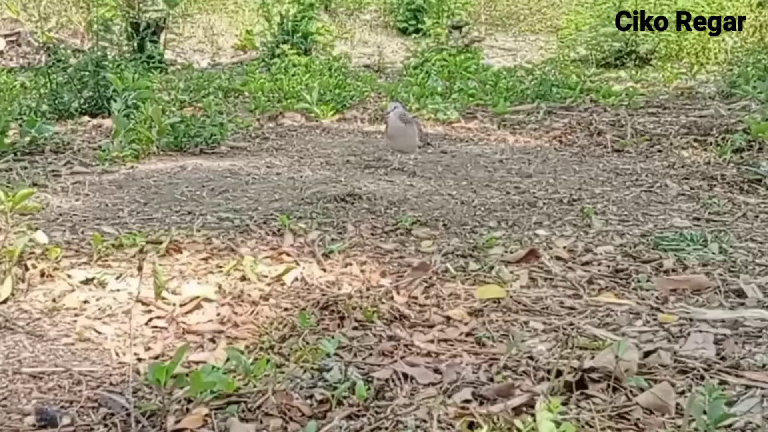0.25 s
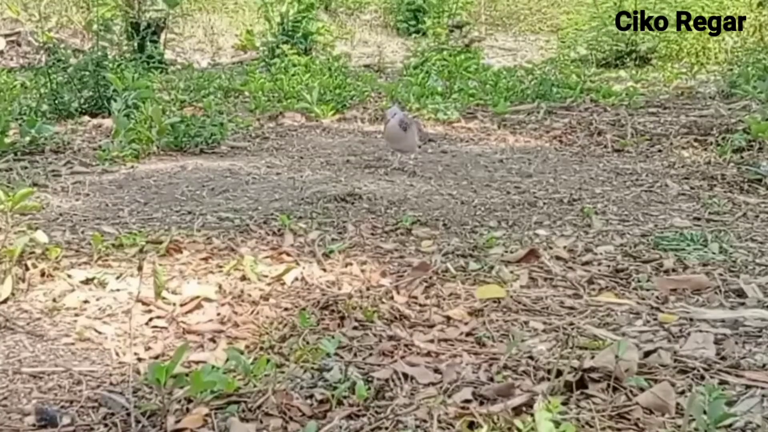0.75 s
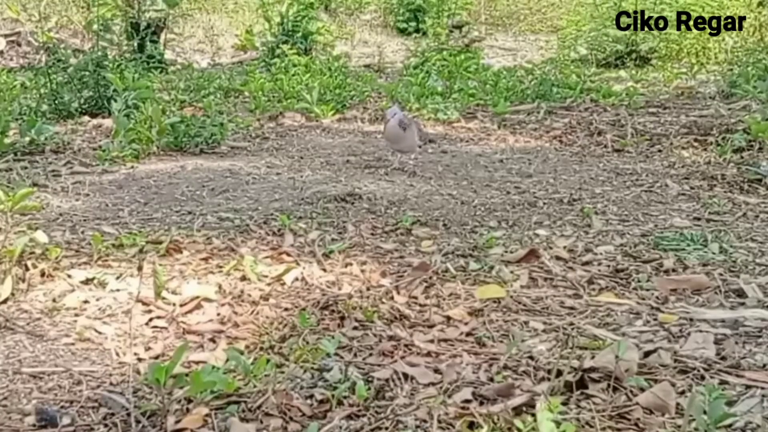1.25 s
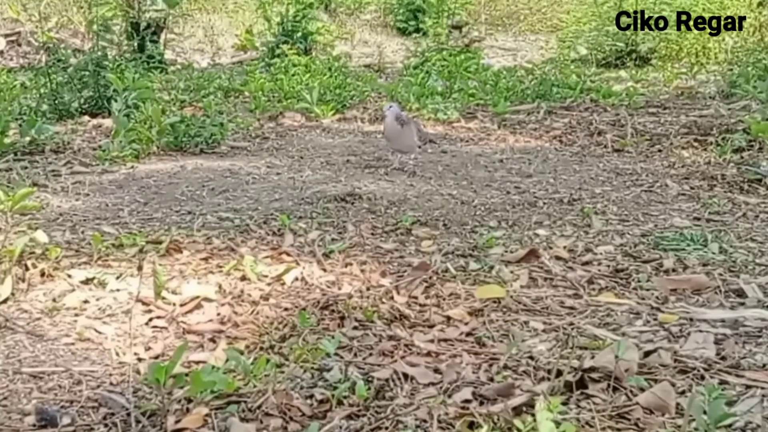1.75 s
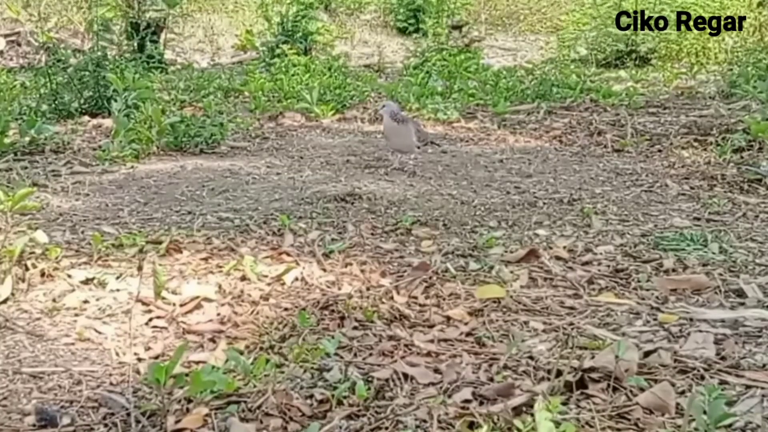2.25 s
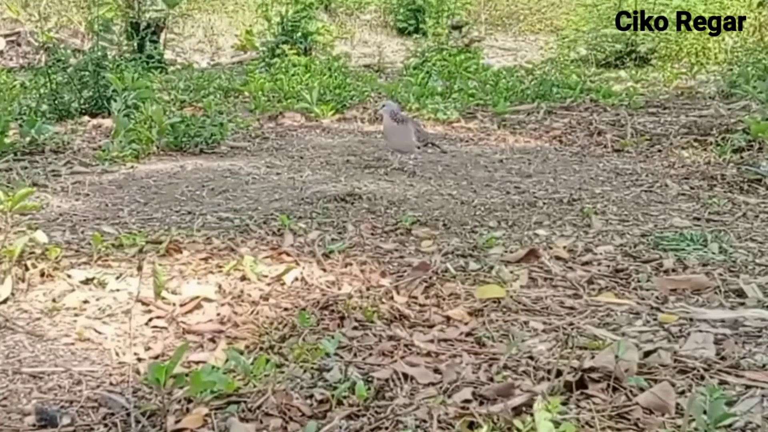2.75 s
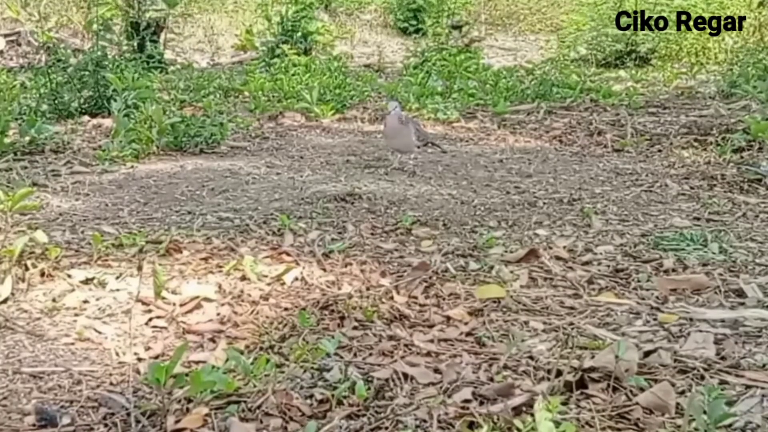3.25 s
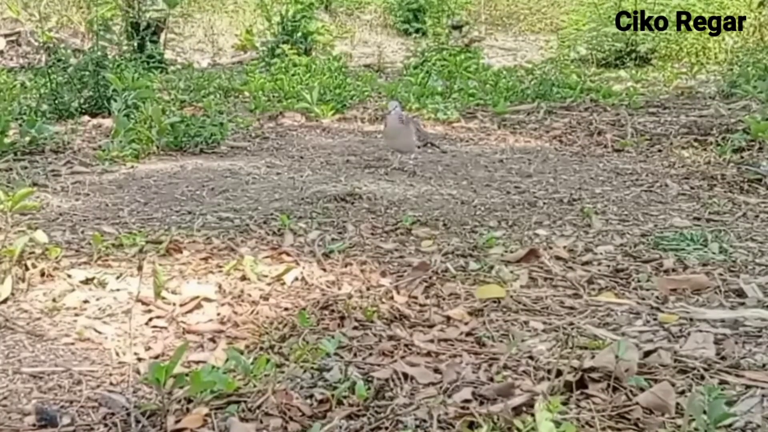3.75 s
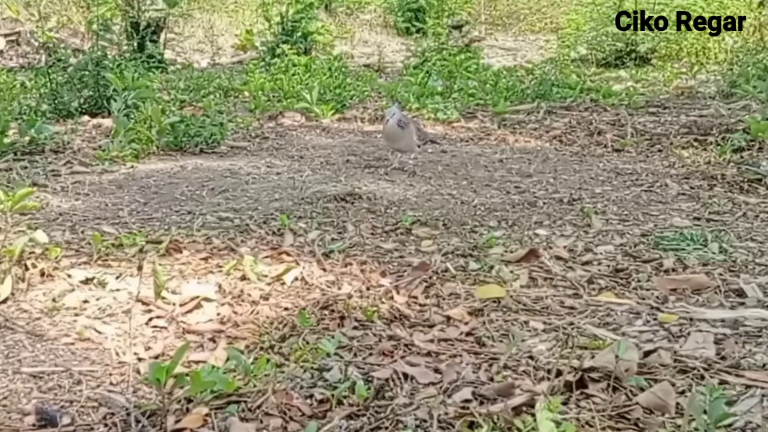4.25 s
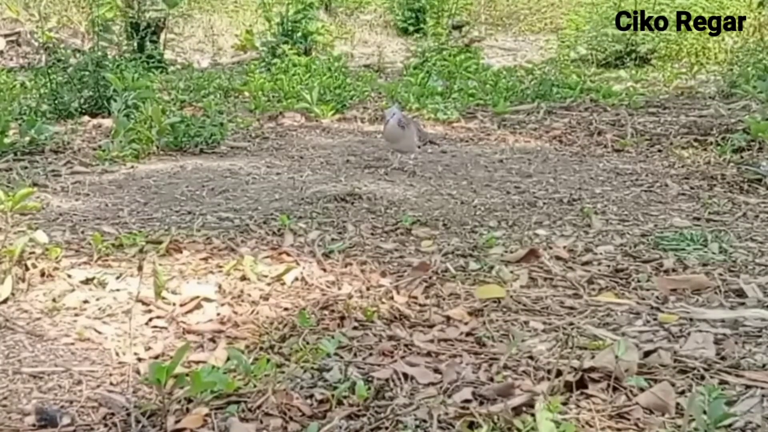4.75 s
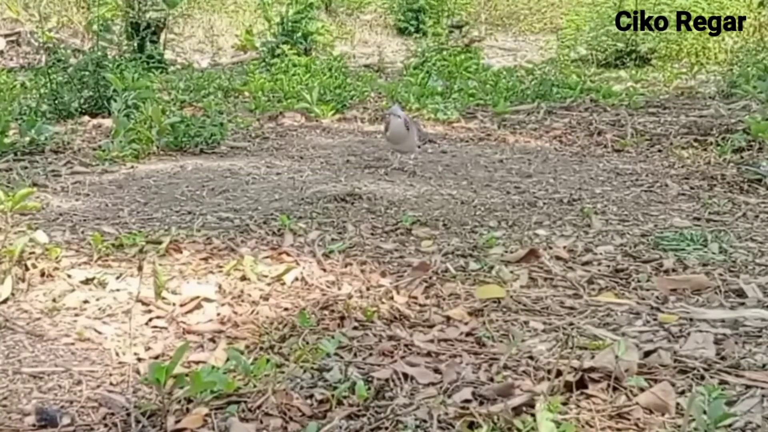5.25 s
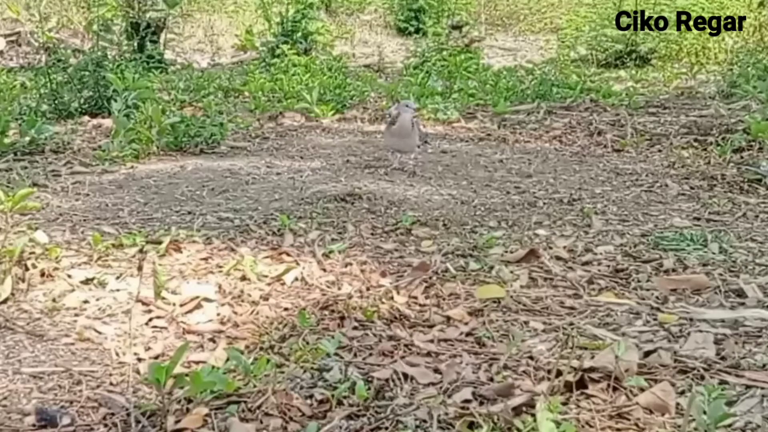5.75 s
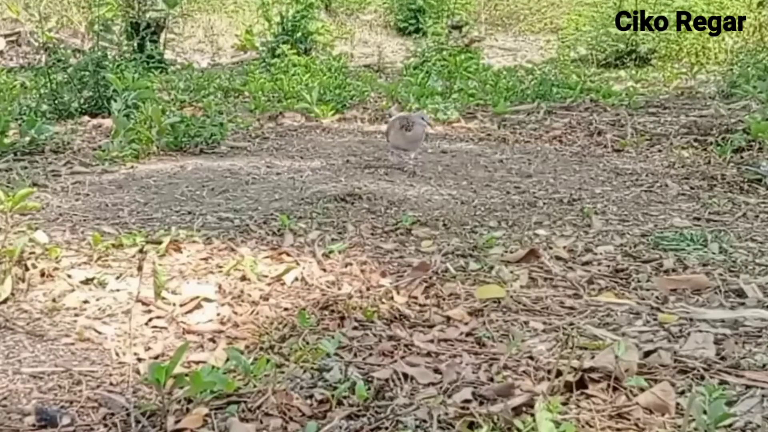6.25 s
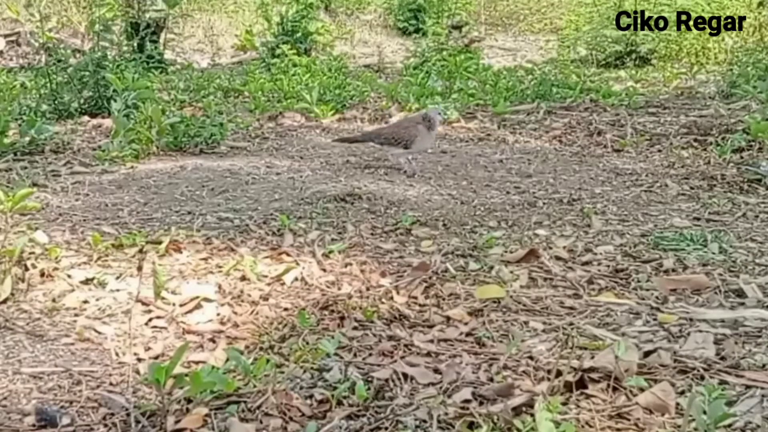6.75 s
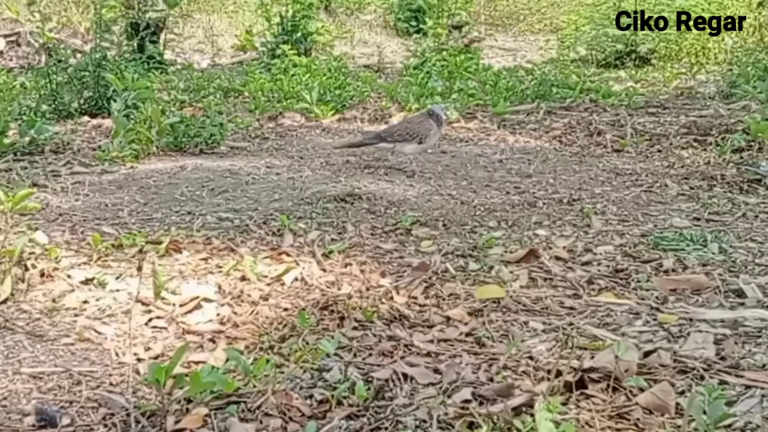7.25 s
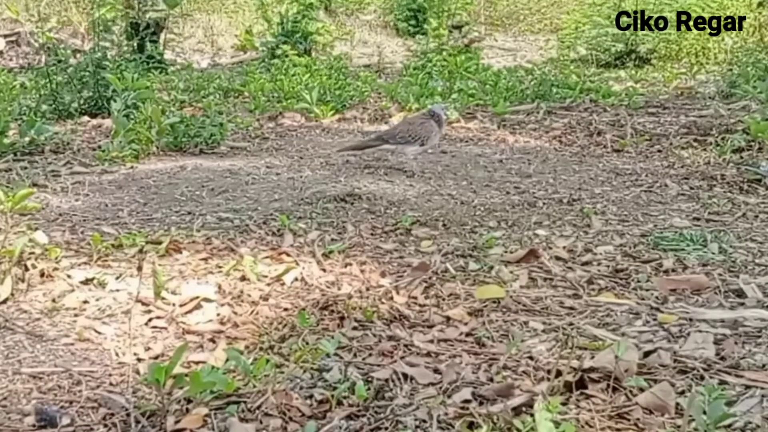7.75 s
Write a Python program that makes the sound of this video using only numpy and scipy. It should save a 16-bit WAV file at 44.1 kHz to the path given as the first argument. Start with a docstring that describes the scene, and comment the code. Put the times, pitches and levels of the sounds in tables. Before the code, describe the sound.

Spotted dove cooing in purring, fluttering notes outdoors, a second dove replying far off, while low wind thumps the microphone and small birds chirp quietly.

```python
"""Two spotted doves coo in a leafy garden: pure throat tones, chopped into rolls by a fluttering valve.
From the outset noise makes foliage hiss and wind; ragged eddies thump it and fluttering tones chirp.
The near dove calls at 0.6 s, leaves tick as noise bursts from 1.6 s, and the far dove answers at 2.5 s.
Wind buffets hardest near 3.6 s; the near dove calls again at 4.2 s and thin gliding tones whistle from 4.6 s.
The far dove answers at 6.2 s, and the near one begins a last call at 7.2 s."""
import sys
import numpy as np
from scipy import signal
from scipy.io import wavfile
from scipy.ndimage import uniform_filter1d, map_coordinates

SR = 44100
rng = np.random.default_rng(int(sys.argv[2]) if len(sys.argv) > 2 else 0)


def waveform_to_disk(signal):
    """Save audio, clipped to [-1, 1], as 16-bit WAV at the path in sys.argv[1]."""
    frames = np.transpose(np.atleast_2d(signal))
    scaled = np.clip(frames, -1, 1) * 32767
    samples = np.round(scaled).astype(np.int16)
    wavfile.write(sys.argv[1], SR, samples)


N = 352800

# Dove levels are those before the throat's band-pass.
# smooth dove notes: t/s, shape, reference level/dB, pitch ratio
COOS = [(.572, "opening", -8.5, 1.007), (1.17, "pip", -7.5, 1.03), (2.48, "far murmur", -46.5, 0.95),
        (2.68, "far hoot", -20.5, 0.99), (3.035, "pip", -31, 1.27), (4.188, "opening", -8, 1.018),
        (4.793, "pip", -7.5, 1.046), (6.15, "far murmur", -45, 0.99), (6.352, "far hoot", -19.5, 1.013),
        (6.711, "pip", -35.5, 1.16), (7.225, "opening", -11.5, 1.015), (7.832, "pip", -14, 1.04)]
# shapes of the smooth notes: t/s from the onset, level/dB re the note, f/Hz before the pitch ratio
COO_SHAPES = { "opening": [(0, -17.5, 441), (.012, -10, 582), (.032, -1.5, 640), (.052, -1.5, 615),
              (.075, -6.5, 600), (.097, -11.5, 479), (.116, -28, 490)], "pip": [(0, -19, 595),
              (.006, -3, 544), (.013, -13, 602), (.02, -40.5, 591)], "far murmur": [(0, -7, 550),
              (.02, -1.5, 550), (.05, -1.5, 523), (.072, -4, 550)], "far hoot": [(0, -32, 542),
              (.04, -16, 594), (.08, -2.5, 672), (.115, 0, 720), (.152, 0.5, 703), (.165, -11.5, 613),
              (.174, -16, 640)], }
# the second note, a roll that swells into a hoot: t/s from the onset, level/dB re the note, f/Hz
SWELL_SHAPE = [(0, -25.5, 543.6), (.055, -22.5, 571), (.11, -11, 587.4), (.165, -6, 633.7), (.205, -5, 664),
               (.228, -0.5, 723), (.25, 0, 745), (.272, -0.5, 705), (.287, -3, 636), (.299, -11.5, 563),
               (.309, -30.5, 610)]
# swelling rolls: t/s, reference level/dB, initial pulse rate/(1/s), flutter duration/s,
# time of a brief level dip/s from the onset, depth of the dip/dB
SWELLS = [(.686, -3.5, 59, .213, .24, 15), (4.307, -3.5, 61.5, .218, .242, 0),
          (7.335, -6.5, 59, .225, .239, 2.5)]
# closing rolls: t/s from the onset, level/dB re the note, f/Hz, gap depth/dB (negative: gaps are louder)
PURR_SHAPES = { "near": [(0, 2, 710.5, 16.5), (.045, 0.2, 706.4, 26), (.17, 1, 695, 22),
               (.22, -2.4, 650, 18.5), (.3, -0.5, 647, 13), (.39, -3, 620, 12.5), (.408, -7.5, 612, -8.5),
               (.422, -5.5, 615, 6.5), (.433, -10, 596, 10.5)], "far": [(0, -5, 700, 18.5),
               (.07, 1, 735, 16.5), (.14, 0, 726.4, 16), (.21, -0.8, 667, 12.5), (.28, -7.5, 624, 12),
               (.35, -9, 639, 11), (.42, -13.5, 590, 2.5), (.45, -18.5, 560, 8.5), (.48, -24, 534, 3),
               (.55, -28.5, 504, -2)], }
# closing rolls: t/s, bird, reference level/dB, initial pulse rate/(1/s), rate increase/(1/s^2),
# stumble onset/s from the note's onset, stumble duration/s
PURRS = [(1.195, "near", -5.5, 40.88, 171.3, .322, 0.0558), (3.051, "far", -20, 42.46, 75.7, 0.45, 0.01),
         (4.819, "near", -6, 41.93, 136, 0.34, 0.016), (6.73, "far", -21, 40.76, 96.5, .355, 0.03),
         (7.857, "near", -8.5, 41.8, 147, .36, 0.02)]
# husky chirps: t/s, duration/s, f/Hz at start, middle and end before smoothing and flutter,
# mean amplitude/dB, overtone level/dB re the fundamental
CHIRPS = [(.295, 0.062, 2950, 2950, 2760, -49, -38.5), (.325, 0.059, 5620, 4550, 3800, -62, -31.5),
          (.365, 0.036, 4150, 3850, 3520, -55, -32), (0.806, 0.041, 2410, 3090, 3100, -39.5, -38),
          (0.832, 0.042, 3930, 4990, 4600, -50.5, -20.5), (.84, 0.076, 2250, 2880, 2390, -51, -24),
          (0.887, 0.043, 3820, 3200, 3250, -48, -30), (1.04, 0.028, 2300, 2260, 2330, -51.5, -34),
          (1.416, 0.035, 4450, 4030, 3570, -50, -27.5), (1.44, 0.039, 3020, 3097, 2740, -36, -29),
          (1.905, 0.051, 4600, 3420, 2820, -47, -27), (1.971, 0.029, 4400, 3120, 2530, -47.5, -21.5),
          (2.041, 0.022, 3500, 3290, 2900, -52, -20), (2.399, 0.08, 2610, 3060, 2220, -48.5, -29),
          (2.441, 0.074, 5640, 4520, 3280, -59, -35), (2.505, .035, 3740, 3440, 3190, -51.5, -30),
          (2.996, 0.032, 4250, 3700, 3420, -48.5, -34), (3.019, 0.034, 3150, 3110, 3200, -36, -40),
          (3.262, 0.04, 3520, 3240, 3050, -45, -30), (3.381, 0.036, 3120, 2930, 2880, -51, -23),
          (3.62, 0.048, 3960, 3560, 2880, -41.5, -20.5), (4.442, 0.047, 4700, 4280, 3630, -46.5, -20),
          (4.47, 0.047, 2470, 3230, 2520, -37, -33), (4.855, 0.12, 3625, 2900, 2930, -49.5, -21.5),
          (5.048, 0.0574, 2640, 2950, 2360, -46.5, -18.5), (5.069, 0.082, 5390, 4200, 3560, -51, -38),
          (5.135, 0.035, 3760, 3620, 3530, -48, -30.5), (5.708, 0.026, 4280, 4650, 3800, -38, -21.5),
          (5.731, 0.023, 3690, 3390, 2980, -32.5, -32.5), (5.93, 0.031, 4020, 3340, 3020, -50.5, -31),
          (6.04, 0.029, 3530, 3090, 2460, -52, -24), (6.391, 0.042, 4260, 3720, 3460, -45, -24),
          (6.414, 0.064, 2920, 3157, 2940, -40, -33), (7.038, 0.017, 2950, 3470, 3900, -42, -23),
          (7.055, 0.03, 4460, 3610, 2850, -36, -20), (7.1, 0.016, 4770, 4760, 4600, -50, -30),
          (7.579, 0.042, 4350, 3600, 2740, -43.5, -29), (7.633, 0.037, 4180, 3500, 2710, -43, -28),
          (7.934, 0.031, 3070, 2940, 2800, -50, -26)]
# clear whistles: t/s, duration/s, initial f/Hz, final f/Hz approached, settling time/s,
# rms level/dB at the start, rms level/dB at three quarters of the length (both before the twinkle)
WHISTLES = [(4.621, 0.036, 1360, 1320, 0.032, -69, -63), (5.21, 0.13, 1210, 1180, 0.061, -57, -64),
            (5.5, .03, 5060, 5020, .02, -58, -65.5), (5.6, 0.096, 5080, 4990, 0.036, -67, -62),
            (5.939, 0.54, 5950, 5070, 0.17, -71.5, -65.5), (6.27, 0.071, 2730, 3080, 0.02, -62, -40.5),
            (6.325, .03, 3090, 2310, 0.034, -48, -52), (6.462, 0.55, 4990, 4270, .33, -69, -57.5),
            (7.28, 0.43, 4630, 4150, 0.19, -64.5, -45), (7.58, .18, 4350, 4310, .05, -57, -60.5),
            (7.87, .09, 4180, 4150, 0.083, -54, -60)]
# ticks of dry leaves and twigs: t/s, body noise level/dB and treble noise level/dB (both before
# band-pass), t60/s (limited to 0.004-0.08)
TICKS = [(1.641, -26, -60, 0.07), (1.66, -26, -63, 0.11), (1.695, -28.5, -61, 0.023),
         (2.9387, -35, -64, 0.037), (3.157, -29.5, -45, 0.11), (3.243, -32, -61, 0.04),
         (3.33, -30, -58, 0.023), (3.8067, -54, -56, 0.036), (4.1376, -48, -50, 0.04),
         (4.82, -34, -49, 0.084), (6.3407, -35, -44, 0.066), (6.3807, -25, -51, 0.043),
         (6.3997, -34, -49, 0.088), (7.221, -28.5, -45, 0.042), (7.802, -69, -51, 0.043)]
# wind eddies: t/s, level/dB before overload, nominal f/Hz, nominal cycles to the crest
THUMPS = [(0.361, -34, 75, 1.5), (0.599, -24, 92, 0.96), (0.676, -22, 101.4, 0.99),
          (0.883, -19, 157.4, 1.66), (0.91, -14.5, 96.9, 1.3), (0.988, -15, 127, 1.43),
          (1.099, -14, 111.5, 1.16), (1.117, -14.5, 172, 0.95), (1.187, -29, 80.7, 1),
          (1.374, -10, 130, 1.24), (1.439, -12.5, 90, 0.89), (1.556, -17, 109, 1.1),
          (1.639, -26.5, 100, 1.2), (1.718, -17.5, 90.4, 1.2), (1.777, -21.5, 98, 0.68),
          (1.866, -24.5, 106, 1.3), (1.927, -24, 129, 0.67), (1.991, -23.5, 102, 1),
          (2.111, -19.5, 140, 1.2), (2.159, -22, 80, 0.52), (2.202, -19.5, 98, 0.66),
          (2.287, -28.5, 75.4, 0.98), (2.826, -25, 82, 0.83), (3.094, -28.5, 101, 1.4),
          (3.251, -12, 158, 1.07), (3.271, -13.5, 112, 1.2), (3.352, -26, 116, 1.1), (3.428, -33, 86, 1.2),
          (3.507, -14, 119, 1.2), (3.534, -14.5, 128, 1.14), (3.559, -11.5, 88.8, 1.3),
          (3.578, -10.5, 75, 1), (3.601, -5, 141.6, 1.08), (3.624, -8, 169, 1.23), (3.657, -6.5, 128, 1.05),
          (3.684, -7.5, 155, 1.14), (3.706, -6.5, 127.4, 0.78), (3.8, -22.5, 121, 0.98),
          (3.862, -17, 118, 0.85), (4.073, -16, 137, 1.3), (4.137, -7, 130.5, 0.85),
          (4.326, -19, 128.7, 1.3), (4.363, -9, 118, 1.06), (4.409, -19, 83.4, 0.81),
          (4.579, -18, 79.8, 0.78), (4.656, -23.5, 88, 1.3), (4.701, -23, 104, 1.5),
          (4.758, -19.5, 80.7, 0.59), (4.835, -18, 81.5, 0.8), (4.904, -29, 85, 1.3),
          (4.983, -25, 94.2, 1.2), (5.153, -30.5, 95, 1.1), (5.257, -25, 113, 0.56),
          (5.358, -26.5, 96, 0.95), (5.453, -11, 88.4, 0.96), (7.713, -24.5, 94, 1.1),
          (7.866, -17, 91.5, 0.84)]
# slow wind strength before eddies and overload: t/s, rms level/dB
GUSTS = [(0.0, -49), (0.2, -47), (0.58, -42), (1.09, -29.5), (1.31, -31), (1.42, -24), (1.58, -29.5),
         (1.72, -34), (2.41, -44), (2.81, -39), (2.92, -45.5), (3.16, -36), (3.3, -30.5), (3.39, -28.5),
         (3.68, -23.5), (4.01, -30.5), (4.12, -33), (4.39, -29.5), (4.52, -34.5), (4.81, -30.5),
         (5.12, -39.5), (5.53, -37), (6.17, -48), (7.29, -45), (7.91, -38), (8.0, -38)]
# relative wind spectrum before the microphone's response: f/Hz, level/dB
WIND_SPECTRUM = [(12, -56), (20, -34.5), (75, 10), (156, -4), (216, -14), (274, -17.5), (348, -17),
                 (483, -40.5), (528, -43.5), (560, -37), (700, -55.5), (910, -81.5), (1540, -120)]
# relative spectrum of foliage and insects: f/Hz, level/dB
HISS_SPECTRUM = [(150, -25.5), (250, 5), (500, 2.5), (1000, -2), (1350, -7), (2000, -2), (2600, 0.5),
                 (3400, -1), (4300, -6.5), (5100, -15), (6500, -20), (8200, -18), (9600, -7.5),
                 (11200, -18), (13000, -25.5), (15400, -25.5)]
# strength of the hiss between about 7.5 and 12 kHz: t/s, rms level/dB
HISS_LEVEL = [(0.0, -65.5), (0.49, -64.5), (0.71, -63), (6.46, -63.5), (7.24, -60), (8.0, -61)]

SWELL_SPEEDUP_PER_S2, HOOT_JOIN_S = 66, 0.0094
SWELL_GAP_DB, SWELL_GAP_END_DB = 42, 13  # gap depth at the start and end of the flutter
CATCH_S = 0.0036  # half-width of the brief dip, to 1/e of its depth in dB
STUMBLE_PER_S, STUMBLE_GAP_DB = 38, 16  # pulse rate and gap depth while the valve hangs
SECOND_LEVEL_SHARE, END_DROP_DB = .75, 2.5  # a whistle reaches its second level at three quarters
THUMP_SAG, THUMP_WOBBLE, THUMP_RAGGED_DB = .15, .2, 2.5  # relative pitch fall, relative wobble, level
THUMP_RASP_DB = -8.5  # turbulence on the edge of each eddy
EDGE_HZ = 15500


def coo(shape, db, ratio):
    """Resonant radiation: the inflated throat emits a nearly pure tone with a slight waver."""
    curves = unroll(shifted(COO_SHAPES[shape], db, ratio))
    level_db, hz = (uniform_filter1d(c, size=260, mode="nearest") for c in curves)
    tone = sine(hz * (1 + 0.023 * wander(len(hz), 80.0)))
    return faded(gain_of(level_db + 0.34 * wander(len(hz), 90.)) * tone, 0.0037)


def swell(db, per_s, flutter_s, catch_s, catch_db):
    """Decaying modulation: the flutter quickens and shallows, then stops and lets the hoot through."""
    level_db, hz = unroll(shifted(SWELL_SHAPE, db))
    t = np.arange(len(hz)) / SR
    depth_times_s = [0, flutter_s, flutter_s + HOOT_JOIN_S]
    depth_db = np.interp(t, depth_times_s, [SWELL_GAP_DB, SWELL_GAP_END_DB, 0])
    dip_db = catch_db * np.exp(-((t - catch_s) / CATCH_S) ** 2)
    return roll(level_db - dip_db, hz, per_s + SWELL_SPEEDUP_PER_S2 * t, depth_db)


def purr(bird, db, per_s, speedup, stumble_s, hang_s):
    """Amplitude modulation at a rising rate: the flutter stumbles once as the valve hangs briefly."""
    level_db, hz, depth_db = unroll(shifted(PURR_SHAPES[bird], db))
    t = np.arange(len(hz)) / SR
    hung = 1. * (t > stumble_s) * (t < stumble_s + hang_s)
    hung = uniform_filter1d(hung, size=200)
    rate = (1 - hung) * (per_s + speedup * t) + hung * STUMBLE_PER_S
    return roll(level_db, hz, rate, (1 - hung) * depth_db + hung * STUMBLE_GAP_DB)


def roll(db, hz, rate, depth_db):
    """Joint amplitude and frequency modulation: a valve chops the tone, and pitch sweeps up per pulse."""
    turns = np.cumsum(rate) / SR + 0.03 * wander(len(rate), 60.)  # the valve keeps uneven time
    place, pulse = turns % 1, turns.astype(int)
    # each pulse has its own phase and strength
    chance = rng.uniform(-1.3, 1.7, (100, 2))[pulse]
    phase_chance, strength_chance = uniform_filter1d(chance, size=130, axis=0).T
    # the valve opens for 12 ms, or for the whole pulse if that is shorter
    opening = np.clip((place - .5) / np.minimum(0.012 * rate, 1), -.5, .5)
    shut = gain_of(-depth_db)
    gate = shut + (1 - shut) * np.cos(np.pi * opening) ** 1.22
    sweep = 0.0046 * np.minimum(depth_db, 15) * np.sin(2 * np.pi * (place - .5))
    phase = 2 * np.pi * np.cumsum(hz * (1 + sweep)) / SR + 1.5 * (1 - shut) * phase_chance
    strength_db = .5 * (1.5 - shut) * strength_chance
    return faded(gain_of(db + strength_db) * gate * np.sin(phase), 0.0019)


def shifted(shape, db, ratio=1):
    """Scaling: a note shape is raised to the level and pitch of one note."""
    return [(s, db + under_db, hz * ratio, *rest) for s, under_db, hz, *rest in shape]


def chirp(length, start_hz, middle_hz, end_hz, db, overtone_db):
    """Random modulation: fast flutter in pitch and strength makes a gliding whistle husky."""
    count = round(length * SR)
    hz = np.interp(np.linspace(0, 2, count), range(3), [start_hz, middle_hz, end_hz])
    hz = uniform_filter1d(hz, size=count // 4, mode="nearest")
    hz = hz * (1 + .07 * wander(count, 520.))
    tone = sine(hz) + gain_of(overtone_db) * sine(2 * hz)
    return faded(gain_of(db + 5.7 * wander(count, 500.)) * tone, 0.0059)


def whistle(length, first_hz, last_hz, settle_s, start_db, second_db):
    """Exponential glide: a thin pure tone settles in pitch and twinkles on its way through the leaves."""
    u = np.linspace(0, 1, round(length * SR))
    hz = last_hz + (first_hz - last_hz) * np.exp(-u * length / settle_s)
    db = np.interp(u, [0, SECOND_LEVEL_SHARE, 1], [start_db, second_db, second_db - END_DROP_DB])
    twinkle_db = 2.3 * wander(len(hz), 41.3)
    tone = sine(hz * (1 + .004 * wander(len(hz), 80.)))
    return faded(np.sqrt(2) * gain_of(db + twinkle_db) * tone, .015)  # root 2: rms to peak


def tick(db, treble_db, t60):
    """Impulsive excitation: decaying noise is split into a body and a treble band."""
    t = np.arange(4000) / SR
    envelope = gain_of(-60 * t / np.clip(t60, .004, .08)) * np.minimum(t / 0.00083, 1)
    crack = rng.standard_normal(len(t)) * envelope
    body = band(band(crack, 1400, 4000), 1400, 4000)
    return gain_of(db) * body + gain_of(treble_db) * band(crack, 5500, 14000)


def garden(x, t60, first_s):
    """Diffuse reflection: trunks and leaves scatter echoes that decay exponentially."""
    t = np.arange(SR // 2) / SR
    taps = rng.standard_normal(len(t)) * gain_of(-60 * t / t60) * (t > first_s)
    return signal.fftconvolve(x, taps / np.linalg.norm(taps))[:N]


def delayed(x, s):
    """Propagation delay: the same sound arrives s seconds later."""
    return np.pad(x, (round(s * SR), 0))[:N]


def thump(db, hz, cycles):
    """Vortex pressure: one eddy gives a ragged push of a few cycles, slowing a little."""
    turns = hz * np.arange(6000) / SR
    shape = (turns / cycles * np.exp(1 - turns / cycles)) ** 1.7
    sag = THUMP_SAG * (np.exp(-turns / cycles) - .4)
    speed = hz * (1 + sag + THUMP_WOBBLE * wander(len(turns), 63.0))
    level = gain_of(db + THUMP_RAGGED_DB * wander(len(turns), 170.0))
    rasp = gain_of(THUMP_RASP_DB) * wander(len(turns), 400.)
    return level * shape * (sine(speed) + rasp)


def wind():
    """Turbulent pressure: eddies press on the microphone in lumps of a few hundredths of a second."""
    rumble = noise(WIND_SPECTRUM, size=2048, patchy_db=2.5, flicker_db=3.5)
    rumble /= np.sqrt(uniform_filter1d(rumble ** 2, size=3000))  # the gusts alone set the slow level
    lumps = evened(rumble * gain_of(2.8 * wander(N, 22.)))
    push = gain_of(unroll(GUSTS)[0][:N]) * lumps
    for s, *row in THUMPS:
        add(push, s, thump(*row))
    # the diaphragm gives less to hard pushes and slow pressure
    return band(0.9 * np.tanh(push / 0.7), 69, 1200)


def hiss():
    """Superposition: foliage and distant insects merge into coloured noise."""
    x = noise(HISS_SPECTRUM, size=512, patchy_db=2.0, flicker_db=0.76)
    return gain_of(unroll(HISS_LEVEL)[0][:N]) * x / np.std(band(x, 7500, 12000))


def noise(points, size, patchy_db, flicker_db):
    """Spectral synthesis: random short-time spectra have drifting patches and a flicker shared by all f."""
    frames, hz = 4 * N // size + 5, np.fft.rfftfreq(size, 1 / SR)
    real, imaginary, patches = rng.standard_normal((frames, len(hz), 3)).T
    patches = uniform_filter1d(patches, size=9, axis=0)  # across pitch
    patches = evened(uniform_filter1d(patches, size=12, axis=1))  # across time
    f, db = np.transpose(points)
    colour_db = np.interp(np.log(hz + 1), np.log(f + 1), db)[:, None]
    flicker = evened(uniform_filter1d(rng.standard_normal(frames), size=4))
    level_db = colour_db + patchy_db * patches + flicker_db * flicker
    spectra = (real + 1j * imaginary) * gain_of(level_db)
    return signal.istft(spectra, nperseg=size, noverlap=3 * size // 4)[1][:N]


def gain_of(db):
    """Logarithmic level: decibels become an amplitude ratio."""
    return 10 ** (np.asarray(db) / 20)


def evened(x):
    """Normalisation: scales to rms 1."""
    return x / np.sqrt(np.mean(x ** 2) + 1e-20)


def add(mix, s, sound):
    """Linear superposition: mixes a sound in at s seconds."""
    part = mix[round(s * SR):][:len(sound)]
    part += sound[:len(part)]


def unroll(rows):
    """Linear interpolation: a table becomes curves at the sample rate."""
    s, *columns = np.transpose(rows)
    t = np.arange(s[0], s[-1], 1 / SR)
    return [np.interp(t, s, c) for c in columns]


def wander(count, hz):
    """Band-limited chance: a smooth random curve of rms near 1 passes hz random knots a second."""
    knots = rng.standard_normal(4000)
    return map_coordinates(knots, [np.arange(count) * hz / SR % 3990], order=3)


def sine(hz):
    """Phase accumulation: a tone follows a pitch curve."""
    return np.sin(2 * np.pi * np.cumsum(hz) / SR)


def faded(x, s):
    """Windowing: gives a soft start and end of s seconds, or less in a short sound."""
    return x * signal.windows.tukey(len(x), min(2 * s * SR / len(x), 1))


def band(x, lo_hz, hi_hz):
    """Band-pass filtering: attenuates sound outside the two corner frequencies."""
    sections = signal.butter(2, [lo_hz, min(hi_hz, SR / 2.2)], "band", fs=SR, output="sos")
    return signal.sosfilt(sections, x)


def scene():
    """Superposition of sources: doves and small birds among the trees, leaves, wind and hiss."""
    doves, birds, leaves = np.zeros((3, N))
    voices = [(coo, COOS, doves), (swell, SWELLS, doves), (purr, PURRS, doves),
              (chirp, CHIRPS, birds), (whistle, WHISTLES, birds), (tick, TICKS, leaves)]
    for voice, table, mix in voices:
        for s, *row in table:
            add(mix, s, voice(*row))
    doves = band(doves, 340, 890)  # the air sac of the throat radiates one broad band
    echo = gain_of(-27) * delayed(doves, 0.007096)
    doves = doves + echo + gain_of(-27) * garden(doves, t60=0.2, first_s=0.01)
    birds = birds + gain_of(-5) * garden(birds, t60=.18, first_s=.008)
    return (doves + birds + leaves + wind() + hiss())[None]


def record(dry):
    """Band limitation: a linear-phase low-pass sets the upper limit of the recorder."""
    taps = signal.firwin(511, EDGE_HZ, window=("kaiser", 9), fs=SR)
    return signal.oaconvolve(dry, taps[None], "same")


dry = scene()
out = record(dry)
waveform_to_disk(out)
```